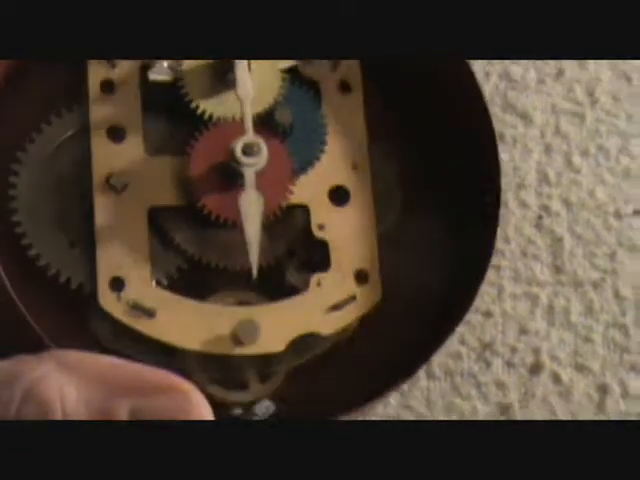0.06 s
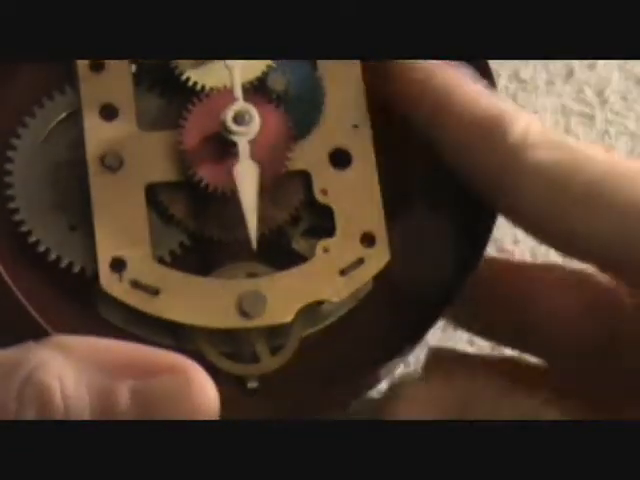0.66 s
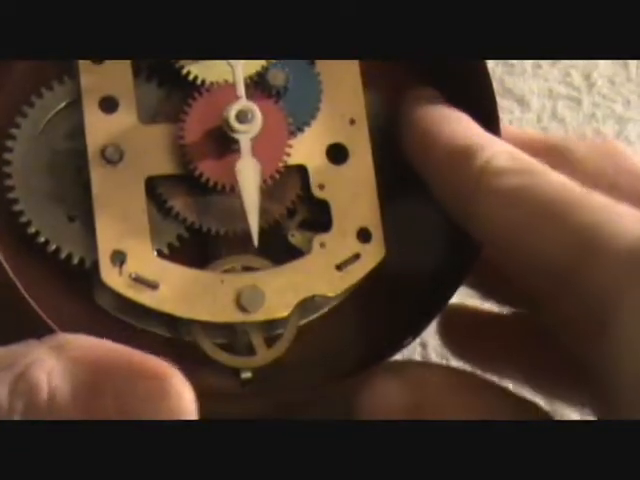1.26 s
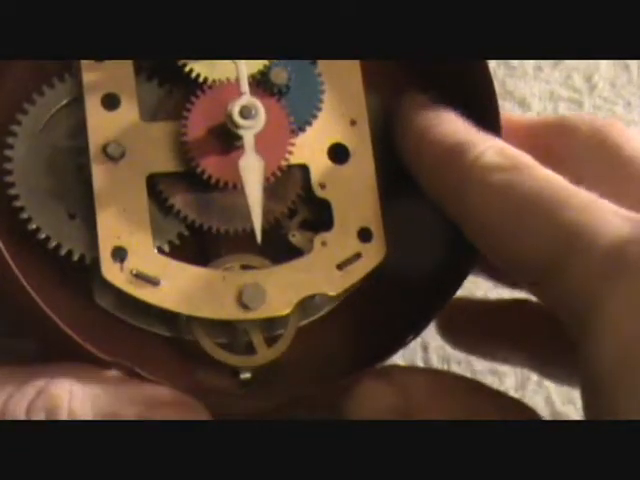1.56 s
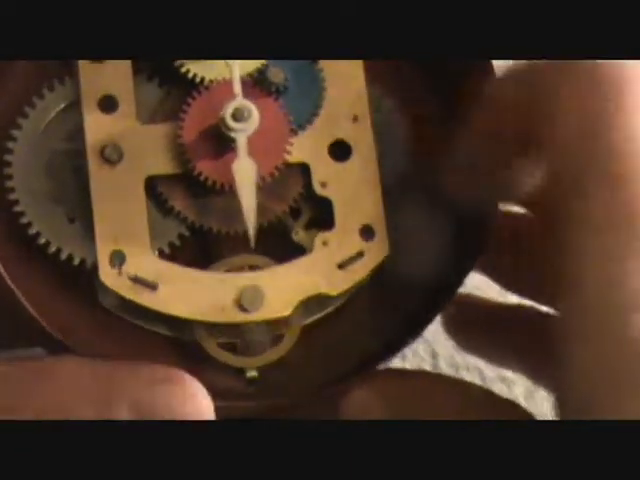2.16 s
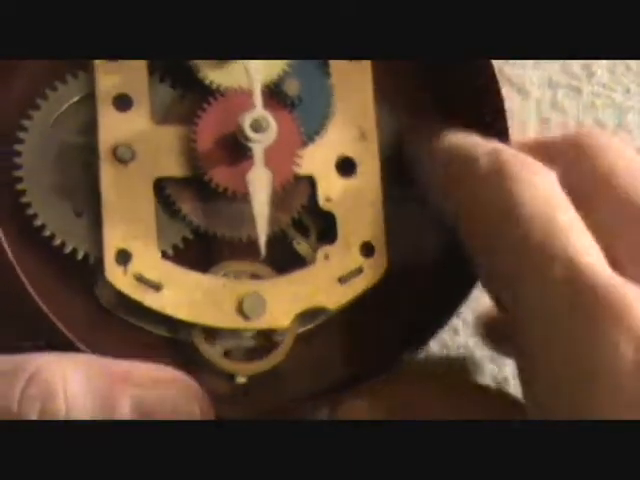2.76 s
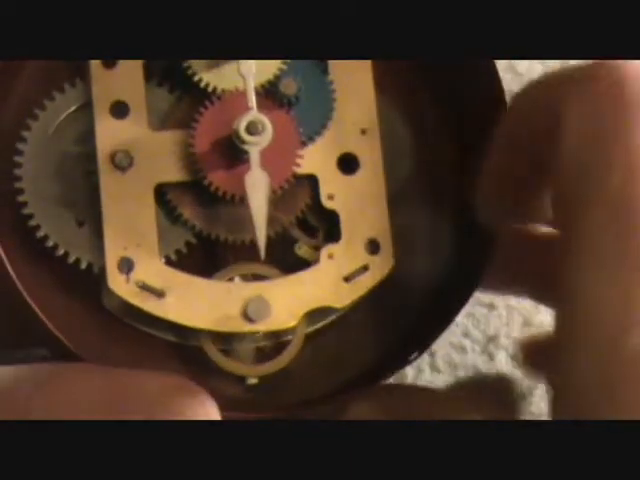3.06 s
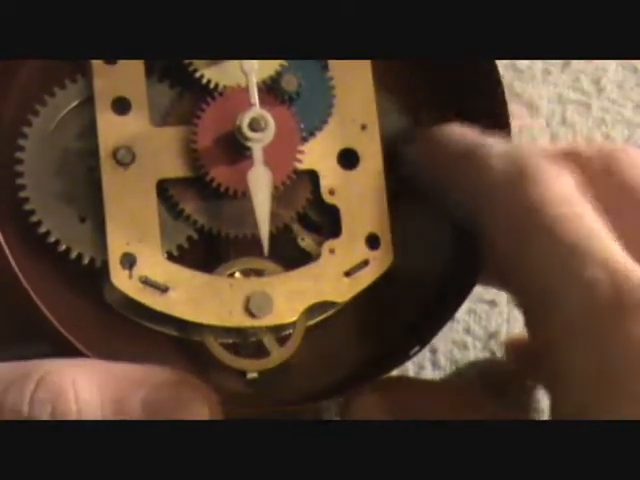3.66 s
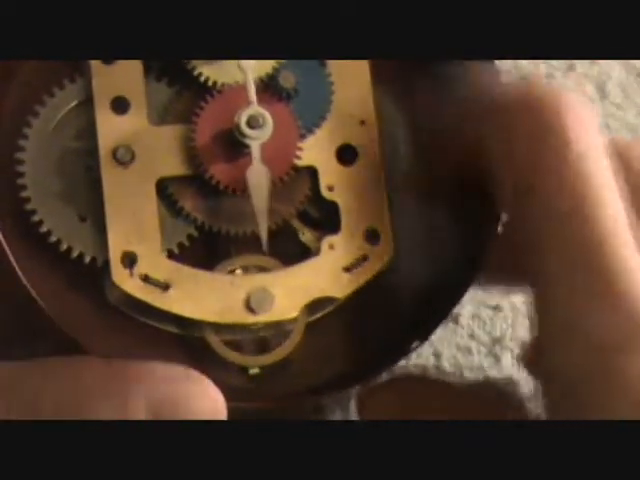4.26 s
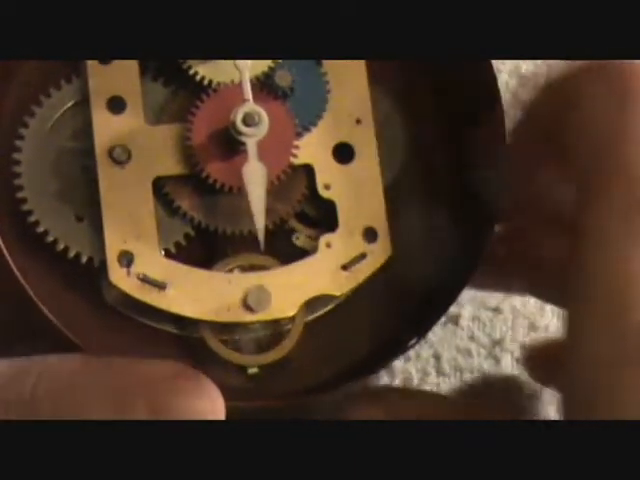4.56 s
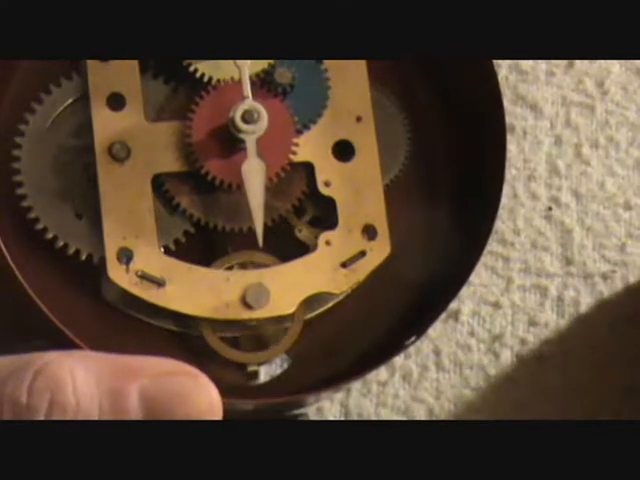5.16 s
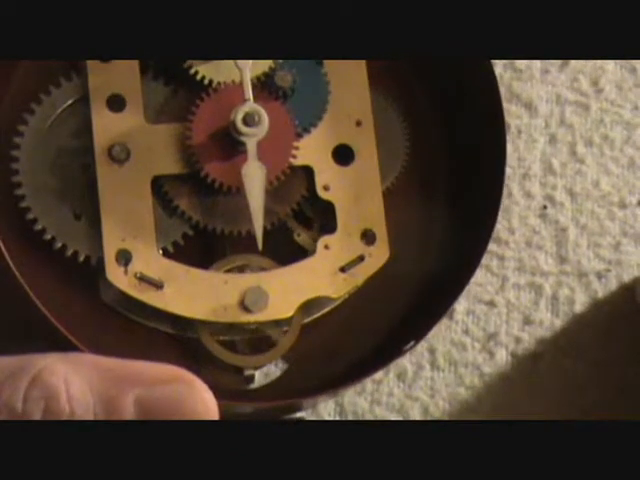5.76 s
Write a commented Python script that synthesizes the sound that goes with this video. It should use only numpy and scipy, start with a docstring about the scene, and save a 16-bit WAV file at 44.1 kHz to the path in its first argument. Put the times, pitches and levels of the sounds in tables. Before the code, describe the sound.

A finger nudges the open brass works of an old wind-up clock in a quiet room. Soft bumps and rubs come first, then three uneven clusters of small metallic snaps and rattles as gear teeth slip and loose wheels knock. Light, irregular ticks follow near the end. The sounds are quiet and close, with a slight echo from a nearby wall, over faint hiss and a camcorder's motor whir.

```python
"""In a quiet room, a finger nudges the open brass movement (the works) of an old wind-up alarm clock.
Gear teeth snap free, loose wheels rattle, and the escapement ticks unevenly as the balance wheel swings.
Each blow makes the brass frame ring, and the fine hairspring sings when brushed. Fingers bump and rub
the case. A nearby wall echoes it all, and a camcorder's motor whirs faintly underneath."""
import sys
import numpy as np
from scipy import signal
from scipy.fft import rfft, irfft, next_fast_len
from scipy.io import wavfile

SR = 44100
rng = np.random.default_rng(int(sys.argv[2]) if len(sys.argv) > 2 else 0)


def wav_out(sig):
    """Save sig, one row per channel (or a flat mono array), as 16-bit PCM at SR to the path in sys.argv[1]."""
    wavfile.write(sys.argv[1], SR, np.round(np.clip(np.atleast_2d(sig).T, -1, 1) * 32767).astype(np.int16))


N = 265923
TIME = np.arange(N) / SR
RING = TIME[:8192]  # the time one blow is given to ring out
ATTACK = SR // 100  # a blow's loudness is set over its first 10 ms

# teeth snapping free: t/s, level/dB, brightness/dB
TOOTH_SNAPS = [(1.9205, -38, 2.5), (2.1335, -46, -7.5), (2.7912, -34.5, 1), (3.7695, -44.5, -7),
               (3.7799, -42.5, 7.5), (3.9517, -42.5, 2.5), (3.958, -44, 0.5), (4.2128, -33.5, 0.5),
               (4.2203, -58, 17), (4.2772, -42.5, 1.5)]
# a snap's tone, in four bands from low to high: level/dB
SNAP_TONE = [0, -5, -4, -2]
def gear_teeth():
    """A pushed tooth slips free and hits the brass with a sharp crack."""
    return brass_frame(TOOTH_SNAPS, "snap", SNAP_TONE, contact_s=.003, crack_db=11, crack_t60=.0074,
                       weak_db=8.5, weak_t60=.072, scatter_db=3, skip=.56)


# wheels knocking: t/s, level/dB, brightness/dB, change per bounce/dB
WHEEL_KNOCKS = [(1.673, -53, -20, -9), (1.8712, -54.5, -1, -6), (1.9215, -50, 13.5, -5.5),
                (1.9843, -48, 4, -12), (2.0294, -58, -11, -18), (2.235, -66.5, 0, -13),
                (2.319, -64, -17, -18), (2.762, -51, 7, -19), (2.8207, -43.5, 5, -7.5),
                (2.8513, -44, 3.5, -6.5), (2.924, -52.5, 0.5, -2), (2.9518, -50.5, -8, -7),
                (3.141, -65, -12, -9), (3.456, -64, 5.5, -8), (3.883, -58, -23, -22),
                (3.9472, -51, -10, -15), (4.1862, -45, 7, -24), (4.2355, -46.5, -3, -2),
                (4.2552, -42.5, 8.5, -10), (4.2722, -40.5, -3, -7), (4.3593, -53, -0.5, -4),
                (4.426, -62, -12, -18), (5.441, -64.5, -10, -15), (5.833, -62.5, 19.5, -24)]
# a knock's tone, in four bands from low to high: level/dB
KNOCK_TONE = [-0.5, -2.5, -25.5, -10]
def loose_wheels():
    """Wheels with room to wobble knock and bounce, which makes a rattle."""
    return brass_frame(bouncing(WHEEL_KNOCKS), "rattle", KNOCK_TONE, contact_s=.0013, crack_db=5,
                       crack_t60=.0049, weak_db=1.5, weak_t60=.045, scatter_db=2, skip=.3)


# the pallet, a small catch, landing on a tooth: t/s, level/dB, brightness/dB
PALLET_TICKS = [(0.7446, -58.5, -1.5), (2.3928, -58.5, 8.5), (3.2218, -56.5, 2.5), (4.4818, -55, 5),
                (4.7715, -47, -11.5), (5.003, -55, -0.5), (5.3003, -49, -6), (5.5291, -54.5, 4.5),
                (5.833, -59, 3)]
# the balance wheel's pin brushing the fork that rocks the pallet: t/s, level/dB
PIN_BRUSHES = [(2.3293, -60), (3.153, -58.5), (4.4506, -57), (4.6668, -61), (4.731, -63), (4.8791, -64),
               (4.973, -56.5), (5.183, -62.5), (5.4713, -65.5), (5.7073, -64.5), (5.737, -63)]
# the tones of tick and pin, each in four bands from low to high: level/dB
TICK_TONE = [-0.5, -4.5, 1, 3.5]
PIN_TONE = [-0.5, -6, -17, -1.5]
def escapement(bounce_db=-15):
    """The ticking part: a catch lands on a toothed wheel and rebounds; a pin taps between beats."""
    light = dict(contact_s=.002, crack_db=11.5, crack_t60=.0068,
                 weak_db=1.5, weak_t60=.068, scatter_db=5, skip=.95)
    landings = bouncing([(*tick, bounce_db) for tick in PALLET_TICKS])
    ticks = brass_frame(landings, "tick", TICK_TONE, **light)
    pin = brass_frame([(s, db, 0) for s, db in PIN_BRUSHES], "tick", PIN_TONE, **light)
    return ticks + pin


# the notes the frame rings at: f/Hz, ring time/s, snap level/dB, rattle level/dB, tick level/dB
FRAME_NOTES = [(1130, 0.049, -15, -21, -17), (1249, 0.06, 0, -14, -12), (1383, 0.038, 4.5, -35, -3),
               (1501, 0.059, 3.5, -9, -1.5), (1653, 0.077, -2.5, -23, -7.5), (1800, 0.059, -21, 3, -0.5),
               (1850, 0.06, -3.5, -2, 1.5), (2070, 0.015, -22, 4, -26), (2338, 0.035, -1, -10, -16.5),
               (2566, 0.1, -7, -10, -26), (2740, 0.044, -9, -4, -10.5), (2837, 0.043, -1, -13, -11),
               (3780, 0.028, -2, 0, -6.5), (3924, 0.033, 5.5, -3.5, -6.5), (4900, 0.028, -19, -38, -32),
               (5230, 0.031, 10.5, -5, -21), (5690, 0.017, 4, 8.5, -2), (6420, 0.044, -8, -37, 5),
               (6670, 0.035, -15, -40, 1), (7640, 0.068, -11, -34, -1), (7980, 0.027, -24, -10, -23),
               (8930, 0.045, -23, -19, -6), (9300, 0.019, 6, -14, 3), (11600, 0.031, 3.5, -3, -9),
               (12000, 0.019, -1, -1, -14)]
# the many weaker notes between them, played as noise: f/Hz, level/dB
WEAK_NOTES = [(200, -49), (550, -27), (950, -12), (1350, 10.5), (2200, -0.5), (3200, -6), (4000, -1.5),
              (6000, 8.5), (9000, 3.5), (12200, -2), (14000, -7.5), (16500, -20)]
# a sharper blow lifts the upper bands; four bands from low to high: share of the brightness
BRIGHTNESS_SHARE = [0, .6, .7, 1]
def brass_frame(blows, kind, tone_db, contact_s, crack_db, crack_t60, weak_db, weak_t60, scatter_db, skip):
    """Each blow rings the frame. Each kind lands in its own place, so it favours different notes."""
    hz, t60, snap_db, rattle_db, tick_db = np.transpose(FRAME_NOTES)
    note_db = {"snap": snap_db, "rattle": rattle_db, "tick": tick_db}[kind]
    decays = np.array([fade(t) for t in t60])
    contact = int(contact_s * SR)
    out = np.zeros(N)
    for s, level_db, bright_db in blows:
        # no two blows hit quite the same spot, and the load on the axles detunes the notes a little
        spot, detune, phase = rng.standard_normal(size=(3, len(hz)))
        cycles = np.outer(hz * (1 + .0095 * detune), RING) + phase[:, None]
        body = undb(note_db + scatter_db * spot) @ (decays * np.sin(2 * np.pi * cycles))
        body += undb(weak_db) * fade(weak_t60) * coloured(WEAK_NOTES, len(RING))
        # the part touches, then skips three times before it settles
        ring = body.copy()
        for when, force in rng.random(size=(3, 2)):
            lag = int(when * contact) + 1
            ring[lag:] += skip * (force - .5) * body[:-lag]
        # metal grinds on metal for as long as the contact lasts
        grind = np.minimum(fade(crack_t60) / fade(crack_t60)[contact], 1)
        crack = undb(crack_db) * grind * coloured(WEAK_NOTES, len(RING))
        click = (ring + crack) * (1 - np.exp(-RING / .00041))
        band_db = level_db + np.array(tone_db) + bright_db * np.array(BRIGHTNESS_SHARE)
        add(out, s, sum(at_level(band, db) for band, db in zip(bands(click), band_db)))
    return out


# fingertips and nails bumping the case and frame: t/s, f/Hz, level/dB
FINGER_BUMPS = [(.239, 1700, -52.5), (.529, 420, -55), (.920, 460, -70), (2.038, 338, -57.5),
                (2.7535, 5170, -50), (2.950, 486, -64), (3.409, 370, -67.5), (3.409, 3180, -57),
                (4.275, 670, -51.5), (4.753, 950, -60)]
def fingers(soft_hz=382, lowest_hz=170):
    """Soft bumps die quickly in the held case; harder, higher ones are noisier and shorter still."""
    out = np.zeros(N)
    for s, hz, db in FINGER_BUMPS:
        hardness = hz / soft_hz
        noise = band_noise(hz, 304 * hardness ** .94, len(RING))
        bump = noise * fade(.045 / hardness ** .36) * (1 - np.exp(-RING / .00032))
        add(out, s, at_level(bump, db))
    # keep the bumps light, with no low rumble
    return signal.sosfilt(signal.butter(2, lowest_hz, "high", fs=SR, output="sos"), out)


# skin rubbing the case: middle t/s, half length/s, level/dB
SKIN_RUBS = [(1.71, .17, -69.5), (3.99, 0.2, -67.5)]
# a nail skidding on brass: middle t/s, level/dB
NAIL_SKIDS = [(0.744, -52.5), (2.481, -53)]
# scraping as the gears are pushed, by teeth and axles except the first, a nail on brass: middle t/s, half
# length/s, level/dB, f/Hz
GEAR_SCRAPES = [(.252, 0.019, -59.5, 1780), (1.426, 0.027, -64.5, 2930), (2.129, 0.018, -53, 1330),
                (2.74, 0.043, -59.5, 2060), (2.844, .03, -62, 5000), (2.968, 0.023, -57, 8600),
                (4.26, 0.062, -53, 4200)]
def sliding():
    """Skin, nail and metal catch and slip as they slide; the case booms softly as the grip shifts."""
    catch_and_slip = unit(undb(2 * band_noise(40, 130)))
    rub_level = sum(swell(*rub) for rub in SKIN_RUBS)
    skin = rub_level * (band_noise(300, 600) + undb(-.5) * band_noise(1250, 3100))
    # a faint, high hiss swells and fades at the start
    opening_hiss = swell(.38, half_s=.44, db=-72) * band_noise(3500, 5400)
    nail = sum(swell(s, half_s=.012, db=db) for s, db in NAIL_SKIDS) * band_noise(7600, 3100)
    metal = sum(swell(s, half_s, db) * band_noise(hz, 2.2 * hz) for s, half_s, db, hz in GEAR_SCRAPES)
    lowest_case_note = unit(np.sin(2 * np.pi * 71.2 * TIME))
    boom = swell(1.53, half_s=.067, db=-68) * lowest_case_note
    return catch_and_slip * (skin + opening_hiss + nail + metal) + boom


# the fine spring being brushed: middle t/s, half length/s, level/dB, f/Hz
SPRING_BRUSHES = [(.85, 0.099, -77, 9020), (2.74, 0.035, -69, 9020), (2.96, 0.042, -68, 9100),
                  (3.55, 0.23, -78.5, 9020), (3.815, .04, -69, 12400), (4.173, 0.033, -67.5, 9000),
                  (4.333, 0.017, -58.5, 8970)]
def hairspring():
    """The spring sings a thin note, and its coils hiss as they brush each other."""
    coil_hiss = undb(-4) * band_noise(9700, 2500)
    return sum(swell(s, half_s, db) * (band_noise(hz, width_hz=200) + coil_hiss)
               for s, half_s, db, hz in SPRING_BRUSHES)


def room(x, wall_db, wall_t60, tail_db, tail_t60):
    """The wall behind the clock echoes at once, differently at each ear; the room follows faintly."""
    wall_tone = [(300, 39), (2000, -6.5), (5000, -8), (10000, 2), (16000, -25)]  # f/Hz, level/dB
    tail_tone = [(300, 5), (3000, 3.5), (8000, 0), (16000, -4)]
    ears = []
    for _ in range(2):
        wall = coloured(wall_tone, len(RING)) * fade(wall_t60) * (RING > .001)
        tail = coloured(tail_tone, len(RING)) * fade(tail_t60) * (RING > .008)
        echo = undb(wall_db) * wall / np.linalg.norm(wall) + undb(tail_db) * tail / np.linalg.norm(tail)
        ears.append(x + signal.fftconvolve(x, echo)[:N])
    return np.array(ears)


# the tone of the hiss and rumble: f/Hz, level/dB
HISS_TONE = [(15, -2.5), (37, 3), (60, -9), (100, -9), (150, -8), (250, -10.5), (550, -12), (900, -11),
             (1130, -8), (1500, -11), (3200, -14.5), (5000, -15.5), (8000, -17.5), (16000, -19)]
# how alike left and right are: f/Hz, likeness (1 is the same, -1 is opposite)
EAR_LIKENESS = [(30, .98), (70, 1), (150, 0.6), (500, -0.71), (1100, -0.46), (3000, -0.47), (12000, 0.64)]
def hiss(level_db=-64.5):
    """Steady microphone hiss and room rumble, partly shared by left and right."""
    alike = np.clip(on_log_axis(EAR_LIKENESS, N), -.99, .99)
    side = irfft(rfft(coloured(HISS_TONE, N)) * np.sqrt((1 - alike) / (1 + alike)), N)
    middle = coloured(HISS_TONE, N)
    return undb(level_db) * np.array([middle + side, middle - side])


# the motor's whining notes: f/Hz, level/dB
MOTOR_NOTES = [(120, -85), (770, -85), (840, -80), (1115, -83), (1195, -81.5), (1260, -87.5), (1965, -87),
               (2519, -85.5)]
# the four beats in each turn of the drive: level/dB
TURN_BEATS = [-65.5, -80, -76, -70]
def camcorder(beat_hz=59.94, scatter_db=2):
    """The motor whines and wavers; its drive turns about 15 times a second, ticking in the housing."""
    whine = sum(undb(db) * band_noise(hz, width_hz=12.2) for hz, db in MOTOR_NOTES)
    beat, phase = np.divmod((TIME - .1945) * beat_hz, 1)
    beat = beat.astype(int)
    beat_db = np.take(TURN_BEATS, beat, mode="wrap") + scatter_db * rng.standard_normal(size=512)[beat]
    housing = band_noise(3260, 290) + .5 * band_noise(2290, 130) + .74 * band_noise(5050, 1800)
    return whine + undb(beat_db) * np.exp(-phase / .31) * housing


def bouncing(knocks, gap_s=.0068, shrink=.8):
    """Follow every knock with two bounces, the second after a shorter gap."""
    lags = np.cumsum([0, gap_s, gap_s * shrink])
    return [(s + lag, db + k * bounce_db, bright_db)
            for s, db, bright_db, bounce_db in knocks for k, lag in enumerate(lags)]


def bands(x, edges_hz=(2200, 4500, 8500)):
    """Split a sound into four bands, from low to high."""
    filters = [signal.butter(4, hz, fs=SR, output="sos") for hz in edges_hz]
    below = [signal.sosfiltfilt(lowpass, x, padtype=None) for lowpass in filters]
    return np.diff([0 * x, *below, x], axis=0)


def band_noise(hz, width_hz, size=N):
    """Noise around one pitch: the narrower it is, the more it sounds like a note."""
    padded = next_fast_len(size, True)
    f = np.fft.rfftfreq(padded, 1 / SR) + 1
    gain = 1 / (1 + ((f - hz ** 2 / f) / width_hz) ** 2)
    return unit(irfft(rfft(rng.standard_normal(padded)) * gain, padded)[:size])


def coloured(points, size):
    """Noise whose tone follows (f/Hz, level/dB) points."""
    return unit(irfft(rfft(rng.standard_normal(size)) * undb(on_log_axis(points, size)), size))


def on_log_axis(points, size):
    """Join (f/Hz, value) points into a curve over all frequencies."""
    hz, value = np.transpose(points)
    return np.interp(np.log(np.fft.rfftfreq(size, 1 / SR) + 1), np.log(hz), value)


def swell(s, half_s, db):
    """A smooth rise and fall that peaks at time s."""
    return undb(db) / np.cosh(np.clip(1.53 * (TIME - s) / half_s, -50, 50))


def fade(t60):
    """Die away by 60 dB in t60 seconds."""
    return np.exp(-np.log(1000) * RING / t60)


def at_level(x, db):
    """Scale a blow so that its start has the given level."""
    return undb(db) * x / np.std(x[:ATTACK])


def add(out, s, x):
    """Mix x into out from time s on."""
    i = int(s * SR)
    out[i:i + len(x)] += x[:max(N - i, 0)]


def undb(db):
    """Turn decibels into a multiplier."""
    return 10 ** (np.asarray(db) / 20)


def unit(x):
    """Scale to an average strength (rms) of 1."""
    return x / np.sqrt(np.mean(x ** 2))


def scene():
    """The handled clock near a wall, over faint hiss and the camcorder's motor."""
    clock = gear_teeth() + loose_wheels() + escapement() + hairspring() + fingers() + sliding()
    return room(clock, wall_db=-10.5, wall_t60=.023, tail_db=-18.5, tail_t60=.21) + hiss() + camcorder()


def record(dry):
    """Cut the highest treble, above 16000 Hz."""
    return signal.sosfilt(signal.ellip(10, .2, 70, 16000, fs=SR, output="sos"), dry)


dry = scene()
out = record(dry)
wav_out(out)
```